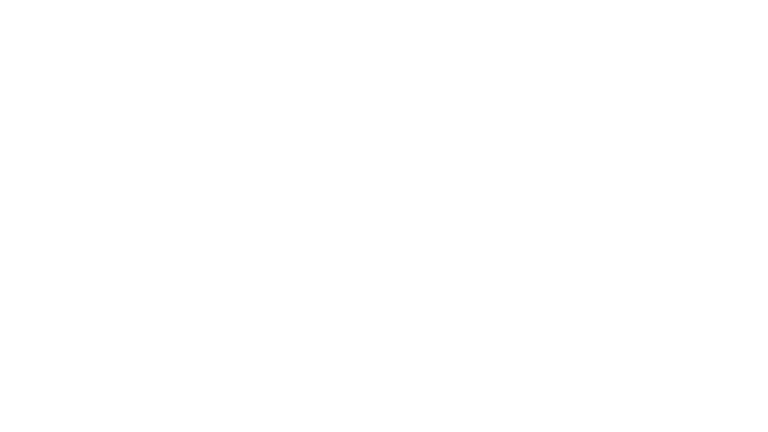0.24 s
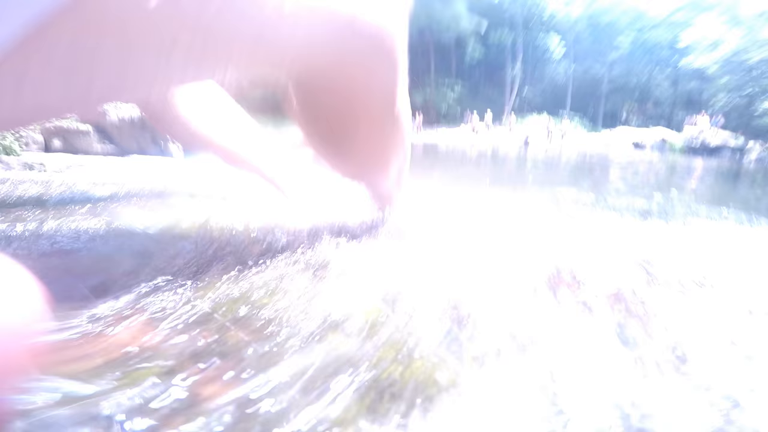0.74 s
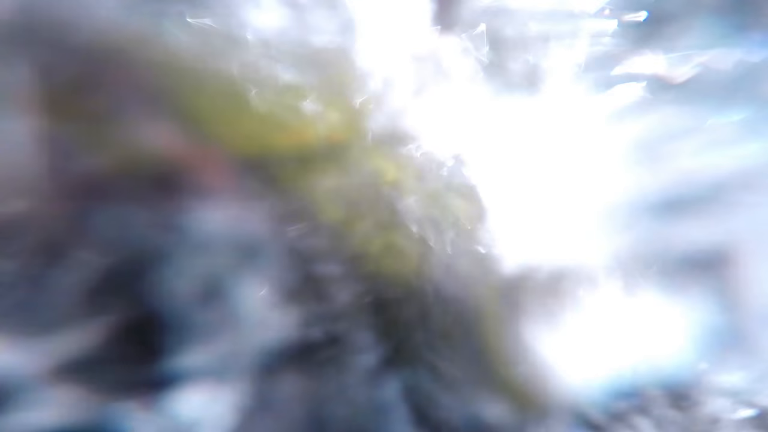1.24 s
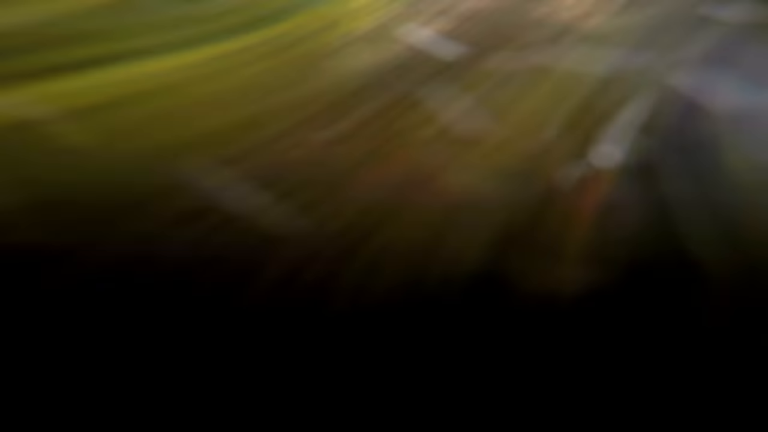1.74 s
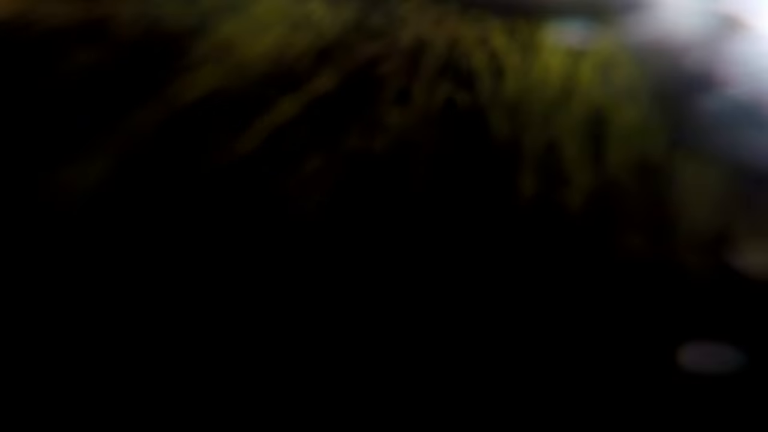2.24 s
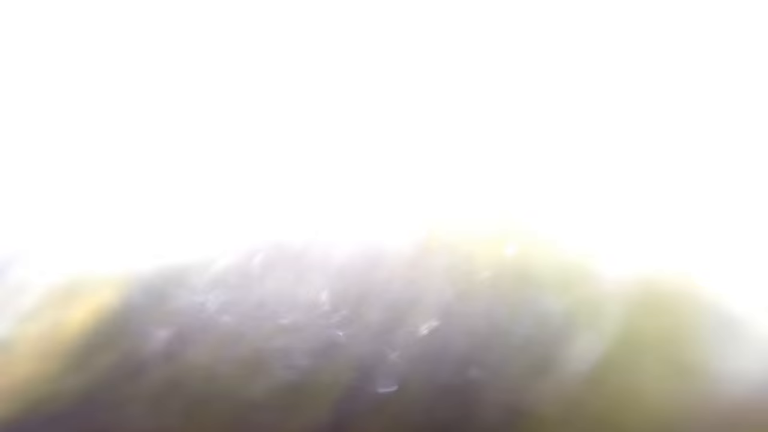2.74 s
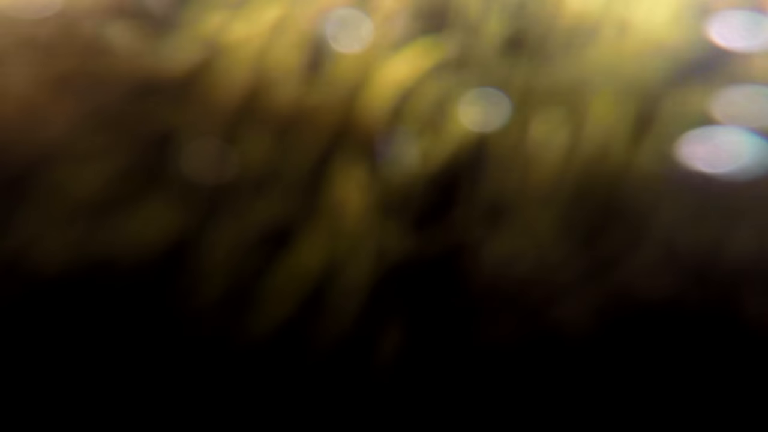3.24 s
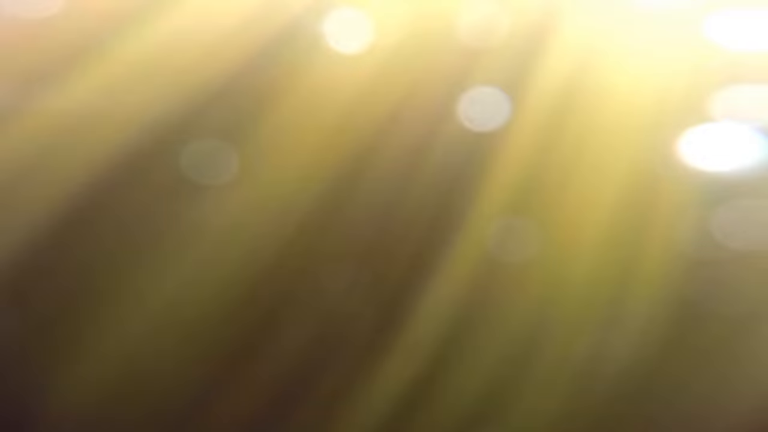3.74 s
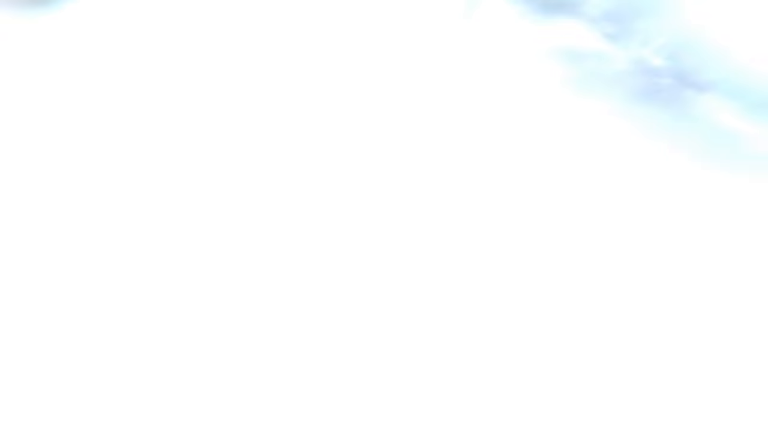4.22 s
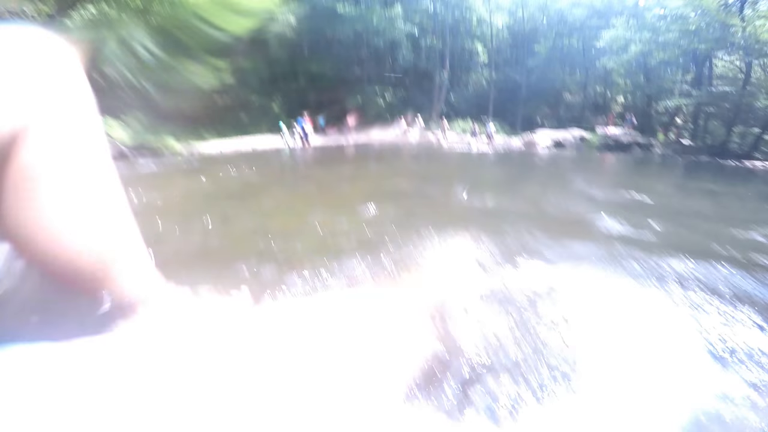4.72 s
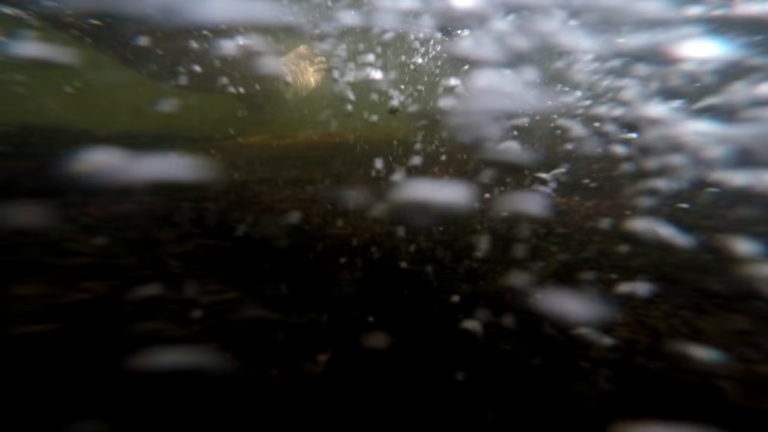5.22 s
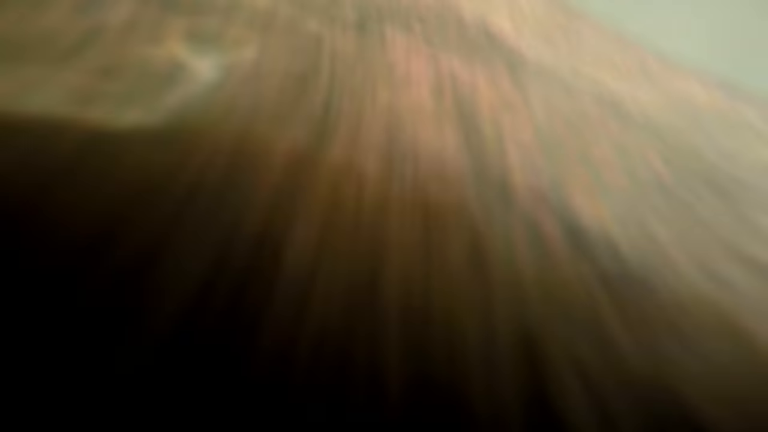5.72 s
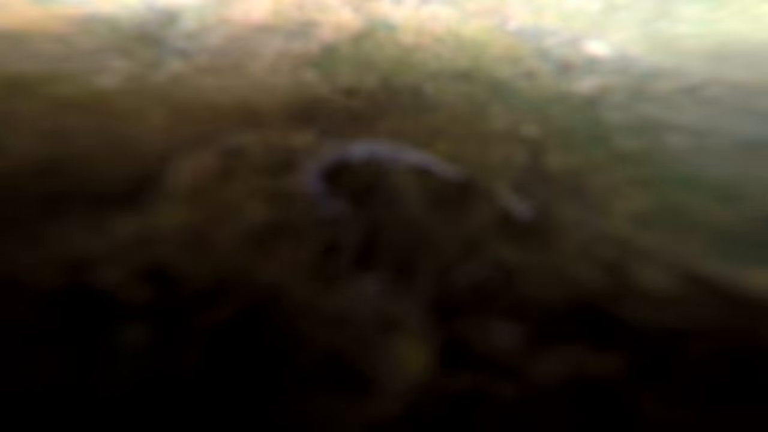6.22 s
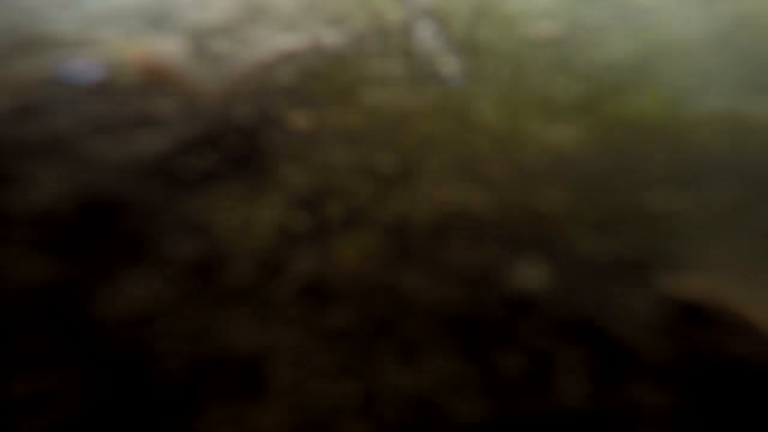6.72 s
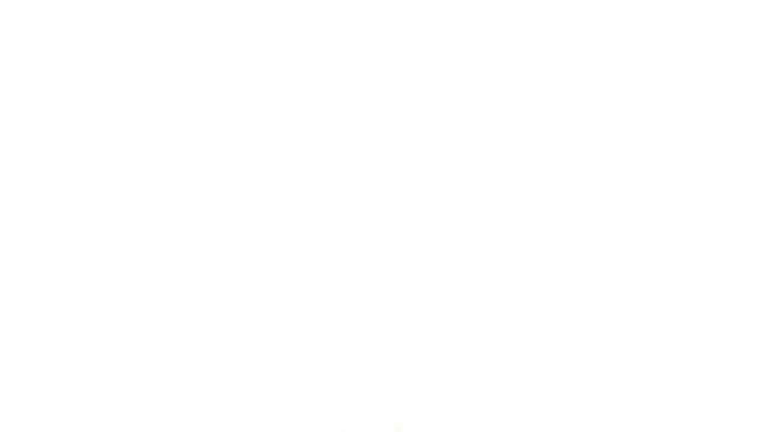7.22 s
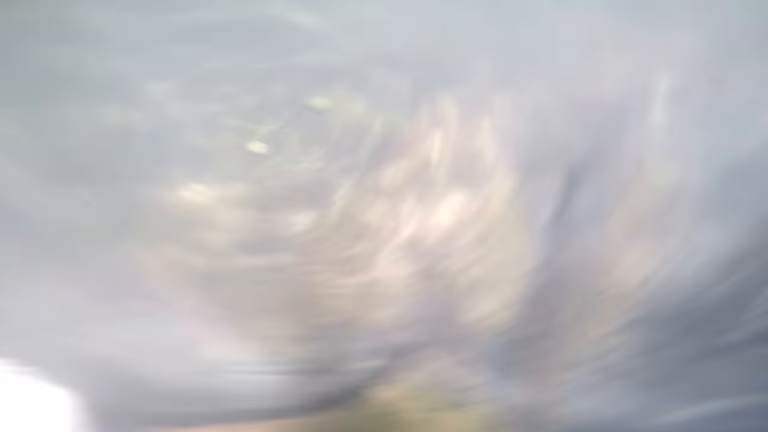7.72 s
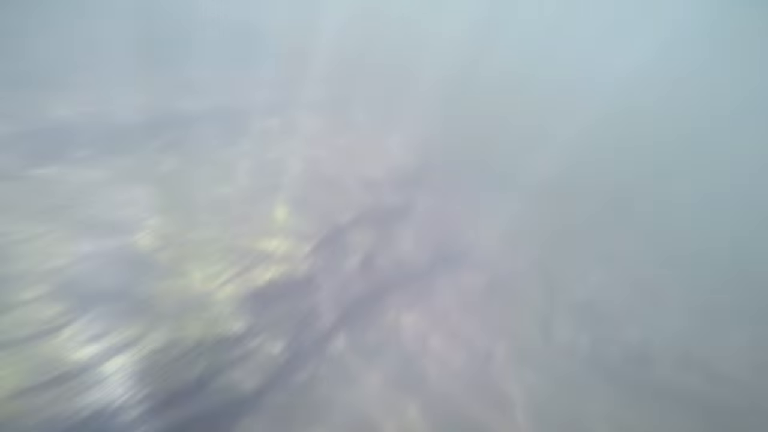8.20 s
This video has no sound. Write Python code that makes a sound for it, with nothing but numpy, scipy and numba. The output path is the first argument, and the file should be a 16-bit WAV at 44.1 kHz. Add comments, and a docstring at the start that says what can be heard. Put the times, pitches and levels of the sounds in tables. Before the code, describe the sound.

Water slaps, sloshes and gurgles close against a small camera housing, then it grinds and knocks roughly along a riverbed before falling almost silent.

```python
"""Camera housing swung through a river

A small camera in a sealed housing passes in and out of the water and strikes and drags on the bed.
Pressure surges and thumps are low noise and damped sines; slaps, spray and grit are noise in bursts.
Bubbles and knocks are damped sines. Rapids and a steady floor lie behind, and the loudest blows overload."""
import sys
import numpy as np
from scipy import signal
from scipy.fft import rfft, irfft, next_fast_len
from scipy.io import wavfile
from numba import njit

SR = 44100
rng = np.random.default_rng(int(sys.argv[2]) if len(sys.argv) > 2 else 0)


def bounce(signal):
    """Save signal as a 16-bit WAV file at the path given by the first command-line argument."""
    frames = np.transpose(np.atleast_2d(signal))
    limited = np.clip(frames, -1, 1)
    pcm = np.round(limited * 32767).astype(np.int16)
    wavfile.write(sys.argv[1], SR, pcm)


N = 373086


def from_db(db):
    """Logarithmic level: decibels to amplitude gain."""
    return 10 ** (np.asarray(db) / 20)


def rms_one(x):
    """Normalisation: scales a signal to rms 1."""
    return x / np.sqrt(np.mean(x ** 2) + 1e-20)


def in_time(rows):
    """Linear interpolation: one value per sample for every column after the time."""
    s, *columns = np.transpose(rows)
    return [np.interp(np.arange(N) / SR, s, column) for column in columns]


def at_hz(points, hz):
    """Spectral interpolation: reads levels in dB on a logarithmic frequency axis."""
    point_hz, point_db = np.array(points).T
    return np.interp(np.log(hz), np.log(point_hz), point_db)


def coloured(x, spectrum):
    """Spectral shaping: filters x by a density curve, silent below its first point; rms 1."""
    size = next_fast_len(N)
    hz = np.maximum(np.arange(size // 2 + 1) * SR / size, 1)
    gain = from_db(at_hz(spectrum, hz)) * (hz > spectrum[0][0])
    return rms_one(irfft(rfft(x, size) * gain, size)[:N])


def bursts(per_s, spread_db, decay_s, steady, rise_s):
    """Shot process: random impacts of uneven size rise and decay over a steady part; rms 1."""
    size = from_db(spread_db * np.minimum(rng.exponential(1, N), 4))
    envelope = size * (rng.random(N) < per_s / SR) + 1e-18
    for seconds in (decay_s, rise_s):
        envelope = signal.lfilter([1], [1, -np.exp(-1 / (max(seconds, 1e-5) * SR))], envelope)
    return rms_one(rms_one(envelope) + steady)


@njit
def add(out, start, gain, step, fade, rise, attack):
    """Damped oscillation: adds decaying sines whose pitch glides as they die."""
    for k in range(len(start)):
        phase, level, w = 0., gain[k], step[k]
        for i in range(min(int(7 / fade[k]), len(out) - start[k])):
            out[start[k] + i] += level * (1 - np.exp(-i / attack[k])) * np.sin(phase)
            phase += w
            w *= 1 + rise[k] * fade[k]
            level *= 1 - fade[k]


def rings(s, db, hz, t60, rise, attack_cycles):
    """Free resonance: one damped sine per row; rise is its pitch climb per e-fold of decay."""
    out, one = np.zeros(N), np.ones(len(s))
    fade = np.clip(np.log(1000) / (np.maximum(t60, 1e-3) * SR), 1e-5, .5) * one
    attack = np.maximum(attack_cycles * SR / hz, 1e-3)
    add(out, (s * SR).astype(np.int64), from_db(db), 2 * np.pi * hz / SR, fade, rise * one, attack)
    return out


SWELL_CYCLES = 2.5   # time constant of a bubble coming to full ring


def bubble_cloud(per_s, low_hz, high_hz, cycles, spread_db, spectrum):
    """Bubble resonance: random bubbles ring for about `cycles` periods to -60 dB; rms 1."""
    draw = rng.random((N // 8, 4))
    born = np.flatnonzero(draw[:, 0] < 8 * per_s / SR)   # one chance every 8 samples
    hz = low_hz * (high_hz / low_hz) ** draw[born, 1]
    db = at_hz(spectrum, hz) + 10 * np.log10(hz) - spread_db * np.log(draw[born, 2] + 0.026)
    t60 = cycles * (.5 + draw[born, 3]) / hz
    return rms_one(rings(8 * born / SR, db, hz, t60, 0.064, SWELL_CYCLES))


def crack(rows, db, decay_s):
    """Impulsive excitation: envelope of the short puff of noise that starts each blow."""
    clicks = np.zeros(N)
    clicks[(rows[:, 0] * SR).astype(int)] = from_db(rows[:, 1] + db)
    return signal.lfilter([1], [1, -np.exp(-1 / (max(decay_s, 1e-4) * SR))], clicks + 1e-18)


# Contact of the housing with the bed. Each row: time in seconds, share of drag from 0 to 1.
BED_DRAG = [(1.72, .17), (1.8, .55), (1.95, .55), (2.0, .17), (5.1, .17), (5.3, .5), (5.4, .93), (6.0, .93),
            (6.45, .8), (7.0, .5), (7.05, .2)]


def bed_drag():
    """Sliding friction: the share of dull grind that takes the place of spray."""
    return in_time(BED_DRAG)[0]


# Sloshes of water over the housing. Each row: start in seconds, length in seconds, strength at the start
# in dB, swell by the end in dB, spray above the slap in dB, pressure above the slap in dB.
SLOSH_EVENTS = [(0.0, 0.087, -42.5, -11, -5, 22), (0.099, 0.058, -33, 16.5, -17, 10.5),
                (0.139, 0.089, -26.5, -16.5, 9, 4), (0.292, 0.079, -50, 8.5, -8, -4),
                (0.454, 0.061, -40.5, 4, -5, 19.5), (0.525, 0.036, -34.5, -3.5, 3, 13),
                (0.689, 0.042, -66, 24.5, 6.5, -17), (0.763, 0.13, -21, -15, 5.5, 1.5),
                (0.877, 0.11, -29, 3, 2.5, 15), (1.055, 0.21, -28, 0.5, 3.5, 8.5),
                (1.378, 0.082, -20, 0.5, -13.5, -2), (1.493, 0.054, -25, -1, -12, 0),
                (1.572, 0.087, -25.5, 13.5, -4, 5), (1.662, 0.048, -30.5, 10, 3.5, -1),
                (1.735, 0.075, -20.5, 17.5, -14.5, -7), (1.806, 0.13, -9, -9.5, -9, -6),
                (2.262, 0.17, -45.5, 9.5, -7, 4), (2.449, 0.09, -30, 1, -8.5, 9.5),
                (2.557, 0.05, -35, -16, -1.5, -10), (2.731, 0.096, -30.5, -1.5, -2.5, 5.5),
                (2.956, 0.071, -44, 18, 6, 6), (3.036, 0.21, -34.5, 10.5, 3, -4),
                (3.248, 0.16, -34, -1, 2.5, 4.5), (3.387, .17, -28.5, 0.5, 3, 2),
                (3.588, 0.016, -27.5, -5.5, -7, -0.5), (3.642, 0.18, -30.5, 1.5, 6.5, -6.5),
                (3.845, 0.12, -33, -3.5, 9.5, -19), (4.443, 0.064, -45.5, 9.5, -3, 5),
                (4.58, 0.056, -56, 11, -9, 7), (4.707, 0.019, -29.5, 5.5, -8.5, 21),
                (4.971, 0.12, -18.5, -4.5, 4.5, 5), (5.108, 0.2, -14.5, -4.5, -7.5, -0.5),
                (5.316, 0.073, -11, -22, -21, 3), (5.405, 0.38, -11, -2, -9.5, -10),
                (5.816, 0.1813, -9, 1.5, -12, -19.5), (6.019, 0.0018, -7.5, -22, -13, -7),
                (6.099, 0.091, -5.5, -4.5, -13.5, -7.5), (6.322, 0.012, -18.5, -7, -13.5, -12),
                (6.339, 0.09, -4.5, -3, -19, -10), (6.546, 0.013, -41.5, -6, -21, 15.5),
                (6.758, 0.091, -53, 4, -20, 20), (6.826, 0.08, -39.5, 23.5, -7.5, -3),
                (6.966, 0.028, -33, 20, -19, 0), (7.036, 0.075, -59.5, 2.5, 0, 7.5),
                (7.116, 0.061, -54, -16, 11.5, 4), (7.665, 0.087, -35, -20, 0, 5.5),
                (7.764, 0.064, -47, -8, 5, 21), (7.952, 0.054, -53, 24, 4, -7),
                (8.131, 0.054, -37, 4, 7.5, -28), (8.222, 0.065, -37.5, -6.5, 7.5, -12),
                (8.33, 0.049, -53.5, 5, 1, 13), (8.437, 0.022, -34.5, 12, -12, 1)]
# Water trickling about the housing. Each row: time in seconds, strength in dB, spray above the slap in dB.
TRICKLE_LEVEL = [(0, -32.5, -8.5), (.3, -58.5, 3), (.62, -72, -4), (1.0, -24, -11), (1.94, -43, -11),
                 (2.2, -55, 0.5), (2.7, -43, -8.5), (3.9, -47, -2.5), (4.1, -60, 7), (4.35, -62.5, 7),
                 (4.9, -45.5, -11), (5.4, -37.5, -7), (6.05, -44.5, -13.5), (6.25, -61.5, -14),
                 (6.65, -69, -2.5), (7.3, -65.5, -3), (7.55, -66.5, -5.5), (7.9, -53.5, -10),
                 (8.46, -43.5, -9)]
# Swing of the camera, felt as slow pressure. Each row: time in seconds, level in dB.
SWING_LEVEL = [(0, -41), (.4, -32.5), (.65, -33), (.95, -46), (1.35, -35), (1.7, -24.5), (2.15, -39.5),
               (2.5, -53), (2.7, -43), (3.6, -37.5), (3.8, -6), (4.0, -32), (4.3, -46.5), (4.93, -27),
               (5.05, -35.5), (5.7, -30.5), (6.3, -30.5), (6.65, -48), (6.78, -38.5), (6.92, -15),
               (7.05, -34.5), (7.35, -52.5), (7.7, -24.5), (8.46, -29)]
# Finest spray relative to the spray. Each row: time in seconds, level in dB.
FINEST_LEVEL = [(0, -10.5), (.5, -14), (.8, -4), (1.5, -4), (2.2, -12.5), (3.2, -6), (3.9, -6), (4.9, -8),
                (5.05, -7.5), (5.45, -11.5), (5.84, -11), (5.9, -5), (6.3, -7), (6.9, -9), (7.75, 1.5),
                (8.2, -11)]
ATTACK_DB_PER_S, SOFTER_START = 2998, 0.071   # rate at -8.5 dB strength; dB of rate lost per dB of weakness
RELEASE_DB_PER_S, LIFT_DB_PER_S = 801, 901.5   # rate off the bed; added at full drag
DULLING_DB_PER_S, FINEST_DULLING_DB_PER_S = 5.5, 7   # spray against slap; finest spray against spray
SHOVE_S = 0.0016   # smoothing time of the slosh pressure


def sloshes(drag):
    """Transient envelopes: levels in dB of surge, slap, spray and finest spray as sloshes come and drain."""
    t = np.arange(N) / SR
    trickle_db, bright_db = in_time(TRICKLE_LEVEL)
    slap, spray, shove = from_db(trickle_db), from_db(trickle_db + bright_db), np.zeros(N)
    finest = spray.copy()
    for s, length, db, swell_db, spray_db, shove_db in SLOSH_EVENTS:
        near = slice(max(int((s - .1) * SR), 0), int((s + length + .2) * SR))
        age = t[near] - s
        attack = ATTACK_DB_PER_S * from_db(SOFTER_START * (db + 8.5))
        release = RELEASE_DB_PER_S + LIFT_DB_PER_S * drag[near]
        level_db = db + swell_db * np.clip(age / length, 0, 1)
        level_db += attack * np.minimum(age, 0) - release * np.maximum(age - length, 0)
        fading_db = level_db + spray_db - DULLING_DB_PER_S * age
        slap[near] += from_db(level_db)
        shove[near] += from_db(level_db + shove_db)
        spray[near] += from_db(fading_db)
        finest[near] += from_db(fading_db - FINEST_DULLING_DB_PER_S * age)
    keep = np.exp(-1 / (SHOVE_S * SR))
    surge = from_db(in_time(SWING_LEVEL)[0]) + signal.lfilter([1 - keep], [1, -keep], shove)
    return 20 * np.log10([surge, slap, spray, from_db(in_time(FINEST_LEVEL)[0]) * finest])


# Colour of the pressure surge. Each row: frequency in Hz, relative density in dB per Hz.
SURGE_COLOUR = [(15, 12.5), (28, 12), (45, 9), (70, 3), (110, -8), (180, -15), (300, -62), (900, -68)]


def pressure_surge(surge_db, white):
    """Pressure fluctuation: low noise in slow bursts pushes on the microphone."""
    pulse = bursts(per_s=25, spread_db=4.0, decay_s=.03, steady=.6, rise_s=.012)
    return from_db(surge_db) * coloured(white, SURGE_COLOUR) * pulse


# Colours of the slap on the housing, spray, finest spray, the bed's grind through the housing and the
# grind's treble. Each row: frequency in Hz, relative density in dB per Hz.
SLAP_COLOUR = [(100, -0.5), (180, 4), (285, 0.5), (420, -0.5), (600, -1), (850, -7), (1200, -16.5),
               (1800, -17.5), (5000, -75)]
SPRAY_COLOUR = [(700, -3.5), (1100, -13.5), (1500, -4.5), (1900, -4), (2600, -3), (3300, -9), (4000, -20.5),
                (5000, -13.5), (7000, -31.5), (14000, -61)]
SHEEN_COLOUR = [(2350, -25.5), (4000, 2), (6550, -12.5), (7440, -12), (8210, -16), (13600, -24.5),
                (15200, -23), (16000, -52.5)]
GRIT_COLOUR = [(900, 1), (1500, -10), (2100, -3), (2800, -4), (3800, -11), (4300, -27), (6000, -45)]
RASP_COLOUR = [(3600, -10), (4200, 0), (5500, -2), (6300, -14), (8200, -13), (12000, -24), (15500, -35)]


def noises(low, middle, high):
    """Broadband excitation: colours white noise as slap, spray, sheen (finest spray), grit and rasp."""
    return (coloured(low, SLAP_COLOUR), coloured(middle, SPRAY_COLOUR), coloured(high, SHEEN_COLOUR),
            coloured(middle, GRIT_COLOUR), coloured(high, RASP_COLOUR))


def water_slaps():
    """Common excitation: one envelope of water impacts drives all bands together."""
    return bursts(per_s=120, spread_db=6.0, decay_s=.0035, steady=.25, rise_s=.0005)


def bed_grind():
    """Frictional excitation: envelope of the dense grind over the bed."""
    return bursts(per_s=90, spread_db=4.5, decay_s=.005, steady=.55, rise_s=.001)


# Weighting of larger bubbles. Each row: frequency in Hz, relative density in dB per Hz.
GULP_COLOUR = [(150, -12), (350, -4), (600, -2), (950, 5), (1300, -11.5)]


def housing_slap(slap_db, drag, slap, slaps):
    """Impact and resonance: water slaps the housing while larger bubbles ring."""
    gulps = bubble_cloud(200, 190.5, 1537, 9.0, 4.5, GULP_COLOUR)
    return from_db(slap_db) * ((0.53 + 0.35 * drag) * slap * slaps + 0.5 * (1 - 0.41 * drag) * gulps)


def spray_and_grit(spray_db, drag, spray, grit, slaps):
    """Noise and resonance: spray and small bubbles give way to grit as the housing drags."""
    bubbles = bubble_cloud(450, 923, 5000, 23.0, 4.2, SPRAY_COLOUR)
    fizz = (1 - drag) * (.58 * spray * slaps + .68 * bubbles)
    return from_db(spray_db) * (fizz + 0.83 * drag * grit * slaps)


def finest_spray(sheen_db, drag, sheen, rasp, slaps):
    """High-frequency impacts: lone sharp spits and tiny bubbles give way to rasp as the housing drags."""
    spits = bursts(per_s=130, spread_db=8.0, decay_s=.002, steady=.1, rise_s=.0003)
    bubbles = bubble_cloud(260, 4910, 13000, 30.0, 4.5, SHEEN_COLOUR)
    shine = (1 - drag) * (sheen * (0.24 * slaps + 0.7 * spits) + 0.68 * bubbles)
    return from_db(sheen_db) * (shine + 0.39 * drag * rasp * slaps)


# Shoves of water on the membrane. Each row: start in seconds, level in dB before the lift below,
# starting pitch in Hz, push 1 or pull -1.
THUMP_EVENTS = [(0.159, -15, 40.4, -1), (0.886, -0.5, 80, 1), (0.957, -6, 65, 1), (1.176, -11.5, 80.5, 1),
                (1.384, -16, 125, -1), (1.638, -2.5, 54.3, -1), (1.671, -7.5, 37.5, 1), (1.744, 6, 90, 1),
                (1.815, -11, 60.4, 1), (3.161, -16.5, 84.5, 1), (3.411, -13.5, 68.4, -1),
                (3.788, -4, 68, 1), (3.876, -17, 52.7, -1), (4.73, -16.5, 82, 1), (5.077, -7.5, 39, 1),
                (5.117, -8, 47, 1), (5.176, 0, 113, -1), (5.32, -3.5, 78.5, 1), (5.357, -6, 90, 1),
                (5.402, -1.5, 59.6, -1), (5.569, -13.5, 184, 1), (5.684, -8.5, 160, 1), (5.863, -13, 56, 1),
                (5.909, -6, 91, 1), (5.98, -8.5, 125, 1), (6.122, 5.5, 126.4, -1), (6.163, -1, 115, 1),
                (6.199, -3, 119.6, 1), (6.395, -12.5, 46.6, 1), (6.83, -8, 120, 1), (6.856, -9, 68, 1),
                (6.883, -3, 117, 1), (6.908, 0.5, 69, 1), (6.991, 1.5, 192, -1), (8.381, -11.5, 32.8, -1)]


def membrane_thumps():
    """Damped displacement: each shove pushes or pulls the membrane and dies within four cycles."""
    rows, out = np.array(THUMP_EVENTS), np.zeros(N)
    for way in (1, -1):
        s, db, hz, _ = rows[rows[:, 3] * way > 0].T
        out += way * rings(s, db + 5, hz, 3.33 / hz, -0.011, 0.055)   # struck harder than its peak
    return out


# Knocks on the housing. Each row: start in seconds, ring level in dB, starting pitch in Hz.
KNOCK_EVENTS = [(0.081, -16.5, 498), (0.145, 4.5, 357), (0.784, -5, 585), (0.837, -3, 1020),
                (0.863, -5.5, 960), (0.982, -13, 493), (1.045, -21, 570), (1.076, -3, 900),
                (1.312, -16, 480), (1.379, 0.5, 507), (1.554, -3, 297), (1.619, 1.5, 516), (1.651, 4, 412),
                (1.742, 10.5, 532), (1.766, 2, 636), (1.795, -0.5, 900), (1.898, -2.5, 910),
                (2.265, -27, 780), (3.406, -3.5, 840), (3.476, -5, 287), (3.641, -20, 930), (3.809, 4, 890),
                (3.866, -13, 290), (3.932, -8, 760), (4.706, -13.5, 232), (4.725, -19, 920),
                (5.02, -12.5, 706), (5.127, 0, 260), (5.172, -4, 367), (5.319, 7, 465), (5.404, 2.5, 258),
                (5.434, 4.5, 657), (5.475, 6.5, 264), (5.568, 3, 284), (5.605, 2.5, 281),
                (5.681, -1.5, 236), (5.947, -33, 288), (6.116, 3.5, 293), (6.324, -7.5, 442),
                (6.348, -0.5, 396), (6.39, 0, 410), (6.414, -2, 484), (6.986, -20, 206), (6.987, 6, 320)]


def housing_knocks(drag, slap, spray, grit):
    """Struck resonance: the housing rings briefly after a puff of noise, grittier while dragging."""
    rows = np.array(KNOCK_EVENTS)
    s, db, hz = rows.T
    ring = rings(s, db, hz, 0.026 * (400 / hz) ** 0.41, -0.002, 0.28)
    puff = slap + 0.44 * ((1 - drag) * spray + drag * grit)
    return ring + crack(rows, -13.5, 0.0034) * puff


# Slips of the housing on a stone. The one row: start in seconds, end in seconds, slips per second,
# mean level in dB.
STONE_SLIPS = (5.776, 5.835, 94, -9)


def stone_stutter(noise):
    """Stick-slip friction: evenly timed slips, each a dull tick with a puff of grit."""
    start, end, per_s, mean_db = STONE_SLIPS
    s = np.arange(start, end, 1 / per_s)
    db = mean_db + rng.normal(0, 2, len(s))
    tick = rings(s, db, 520 + 0 * s, 0.012, 0., 0.048)
    return tick + crack(np.c_[s, db], -12.0, 0.0021) * noise


def stone_catch():
    """Interrupted sliding: gain of the wash, which sinks while the housing catches on the stone."""
    start, end = STONE_SLIPS[0] - .016, STONE_SLIPS[1]
    return np.interp(np.arange(N) / SR, [start - .004, start, end - .02, end], [1, .06, .25, 1])


# Single bubbles and splashes at the port. Each row: start in seconds, level in dB before the scaling
# below, starting pitch in Hz.
POP_EVENTS = [(0.0204, -15.5, 2710), (0.1296, -7, 1670), (0.187, -19, 4060), (0.5319, -14, 1870),
              (0.7607, 1.5, 2620), (0.7948, 1, 2630), (0.9182, -6, 7430), (0.9532, -3, 2620),
              (1.0077, -10.5, 1750), (1.05, -12, 3860), (1.0791, -2, 1510), (1.1193, 0, 3740),
              (1.1398, -4, 1990), (1.1638, -8.5, 2550), (1.2027, -7.5, 2440), (1.2543, -9, 2530),
              (1.3137, -12.5, 2320), (1.359, -22, 9000), (1.3939, -3, 1940), (1.4247, -3.5, 2070),
              (1.489, -9.5, 3850), (1.516, -0.5, 2420), (1.5553, -9.5, 1990), (1.5756, -9, 4000),
              (1.5948, -9, 2600), (1.6266, -12.5, 2260), (1.73, -4, 2370), (1.7448, 3.5, 1340),
              (1.7693, -2.5, 1600), (1.7969, 1.5, 1730), (1.8242, -2, 1310), (2.265, -25, 2840),
              (2.352, -26, 1870), (2.399, -19, 1800), (2.408, -20, 2900), (2.4687, -20, 2600),
              (2.666, -24.5, 2700), (2.7176, -19, 3830), (2.9381, -22, 2640), (3.042, -7.5, 2210),
              (3.1183, -11, 1690), (3.16, -8, 4000), (3.165, -6, 1820), (3.253, -9, 1350),
              (3.3956, -8, 2340), (3.455, -16, 3540), (3.5435, -7, 3100), (3.6709, -10, 3190),
              (3.6922, -4.5, 2470), (3.8102, -4, 1620), (3.88, -7.5, 1620), (3.9973, -20.5, 4570),
              (4.503, -23, 1640), (4.9661, 5.5, 3360), (4.982, -3, 2930), (4.989, -9, 1680),
              (4.999, -4, 1770), (5.023, -4.5, 1320), (5.0441, 1, 1720), (5.0827, -3.5, 1950),
              (5.1108, -9.5, 2330), (5.162, -8, 3150), (5.204, -7, 1380), (5.2137, -3.5, 2430),
              (5.3175, -3, 2120), (5.4035, -8, 2290), (5.6523, -9.5, 2330), (6.988, -5, 1715),
              (7.052, -31, 3600), (7.079, -29, 4030), (7.183, -42, 3090), (7.228, -30, 3400),
              (7.2697, -27.5, 2750), (7.434, -50.5, 2850), (7.477, -39.5, 3400), (7.497, -36, 2380),
              (7.5076, -26.5, 2980), (7.526, -44.5, 3380), (7.548, -48, 3450), (7.582, -43.5, 3650),
              (7.606, -42, 2980), (7.624, -46, 3100), (7.6625, -12.5, 1740), (7.9428, -29, 2670),
              (7.9624, -16.5, 3060), (8.1325, -22.5, 1590), (8.172, -16, 2540), (8.3573, -19, 3850)]


def bubble_pops(spray, sheen, spray_db, sheen_db):
    """Bubble resonance: single bubbles ring after a puff of spray, the small ones dying sooner."""
    rows = np.array(POP_EVENTS)
    s, db, hz = rows.T
    ring = rings(s, db + 2, hz, 0.015 * (2500 / hz) ** 0.6, 0.01, SWELL_CYCLES)
    puffs = np.c_[s, 1.12 * db]   # weak pops are nearly pure ring
    fine_puff = crack(puffs, -11, 0.00089) * sheen * from_db(.5 * (sheen_db - spray_db))
    return ring + crack(puffs, -6, 0.0015) * spray + fine_puff


# Large bubbles that sing upward. Each row: start in seconds, level in dB, starting pitch in Hz,
# ring time to -60 dB in seconds, fractional pitch climb per e-fold of decay.
GURGLE_EVENTS = [(.148, -8, 330, .075, .38), (2.75, -24, 900, .058, .06), (2.93, -36, 1100, .05, .06),
                 (3.94, -18, 1110, .05, .06), (4.1, -37, 870, .057, .06), (4.452, -31, 760, .06, .04),
                 (4.472, -30, 820, .07, .04), (7.38, -46, 643, .07, .03), (7.52, -51, 370, .1, .03),
                 (7.566, -46, 373, .2, .02)]


def gurgles():
    """Bubble resonance with glide: each large bubble's pitch climbs as its ring decays."""
    s, db, hz, t60, rise = np.array(GURGLE_EVENTS).T
    return rings(s, db, hz, t60, rise, 0.25)


# The rapids, heard while the port is in the air. Each row: time in seconds, level in dB.
RAPIDS_LEVEL = [(0, -46), (.2, -60), (.45, -53.5), (.72, -48), (.8, -26), (1.9, -96), (2.6, -65),
                (3.9, -39), (4.05, -52.5), (4.3, -54), (4.5, -45.5), (4.7, -44.5), (4.85, -32), (4.96, -31),
                (5.1, -60), (5.3, -94.5), (7.0, -90.5), (7.1, -65.5), (7.3, -76), (8.46, -69)]
# Colour of the river in the air. Each row: frequency in Hz, relative density in dB per Hz.
RIVER_COLOUR = [(300, -30), (500, -14), (1000, -13), (1520, -20), (1690, -5), (2080, 0), (2550, -6),
                (2800, -15), (3680, -22), (4370, -16), (5300, -25), (12000, -34), (15600, -52)]


def distant_rapids(white):
    """Amplitude modulation: river noise churns unevenly as the rapids splash."""
    churn = bursts(per_s=60, spread_db=3.0, decay_s=.015, steady=1.8, rise_s=.003)
    return from_db(in_time(RAPIDS_LEVEL)[0]) * coloured(white, RIVER_COLOUR) * churn


# Colour of the steady floor. Each row: frequency in Hz, relative density in dB per Hz.
FLOOR_COLOUR = [(100, -7.5), (300, -9), (750, -15.5), (1000, -32.5), (5000, -35.5), (15000, -52.5)]


def noise_floor(white):
    """Stationary noise: a constant coloured hiss at -67.5 dB rms."""
    return from_db(-67.5) * coloured(white, FLOOR_COLOUR)


def scene():
    """Superposition: surge, wash and bubbles follow the sloshes; single blows lie on top."""
    drag = bed_drag()
    surge_db, slap_db, spray_db, sheen_db = sloshes(drag)
    white = rng.standard_normal((6, N))
    slap, spray, sheen, grit, rasp = noises(white[1], white[2], white[3])
    slaps = water_slaps()
    surge = pressure_surge(surge_db, white[0])
    slaps = (1 - drag) * slaps + 0.59 * drag * bed_grind()
    wash = housing_slap(slap_db, drag, slap, slaps)
    wash += spray_and_grit(spray_db, drag, spray, grit, slaps)
    wash += finest_spray(sheen_db, drag, sheen, rasp, slaps)
    water = surge + stone_catch() * wash
    blows = membrane_thumps() + housing_knocks(drag, slap, spray, grit) + stone_stutter(slap + 0.75 * grit)
    bubbles = bubble_pops(spray, sheen, spray_db, sheen_db) + gurgles()
    return (water + blows + bubbles + distant_rapids(white[5]) + noise_floor(white[4]))[None]


def record(dry):
    """Saturation and band limiting: the converter overloads with a hard knee, then the top is cut."""
    knee = 5   # exponent; higher is harder
    clipped = dry / (1 + np.abs(dry) ** knee) ** (1 / knee)
    rolled = signal.sosfilt(signal.butter(8, 15700, fs=SR, output="sos"), clipped)
    return signal.sosfilt(signal.cheby2(12, 70, 16400, fs=SR, output="sos"), rolled)


dry = scene()
out = record(dry)
bounce(out)
```